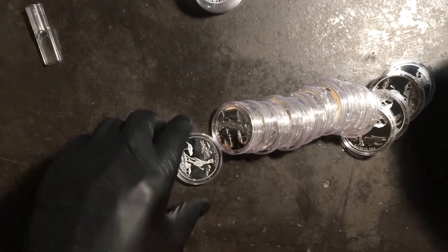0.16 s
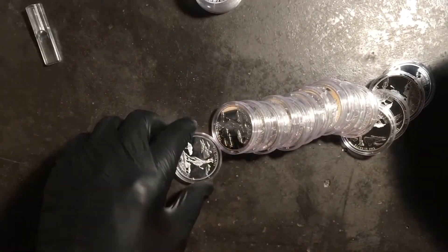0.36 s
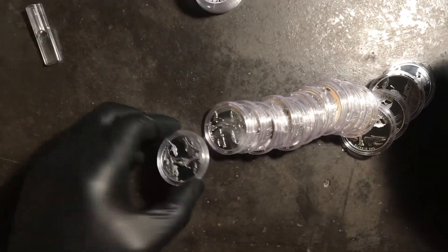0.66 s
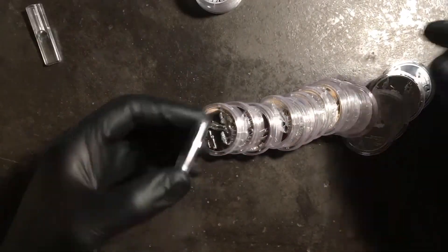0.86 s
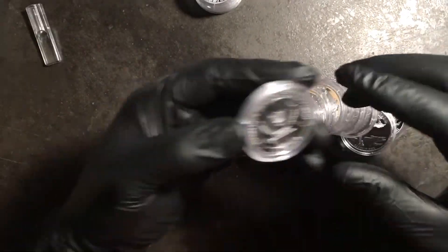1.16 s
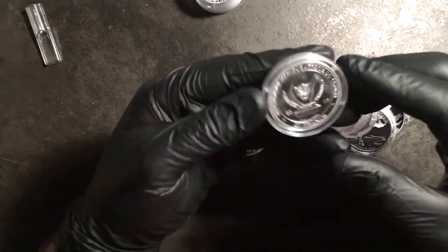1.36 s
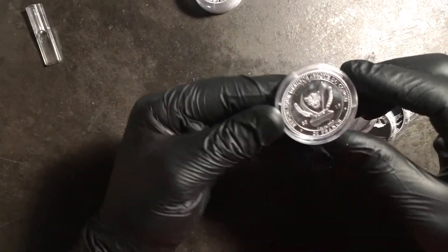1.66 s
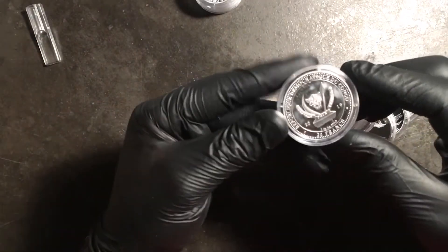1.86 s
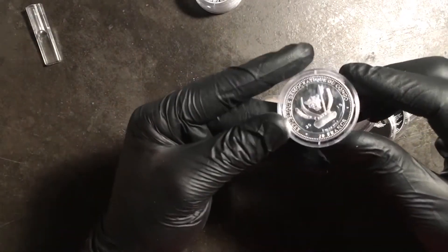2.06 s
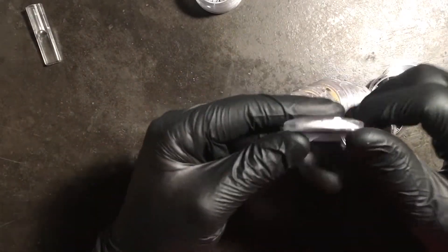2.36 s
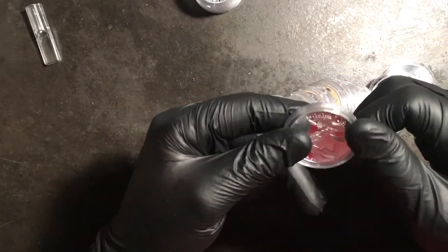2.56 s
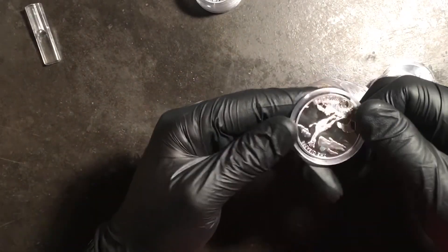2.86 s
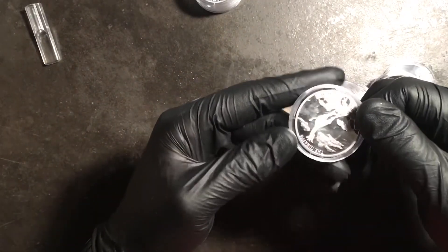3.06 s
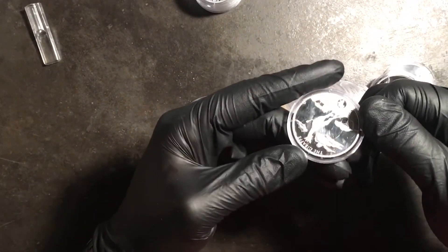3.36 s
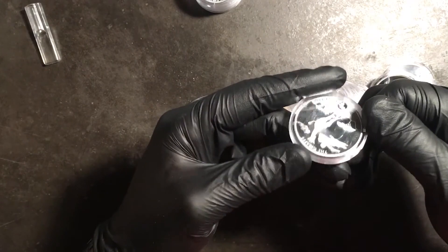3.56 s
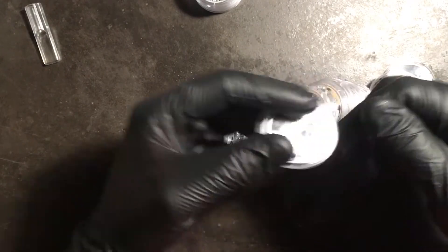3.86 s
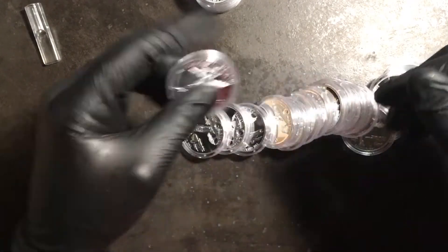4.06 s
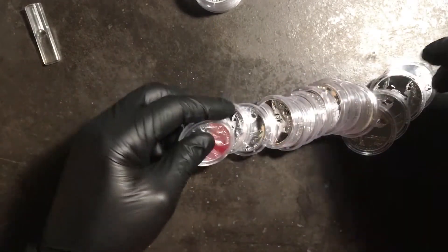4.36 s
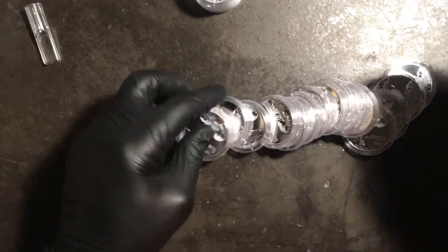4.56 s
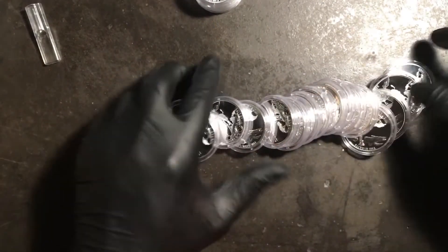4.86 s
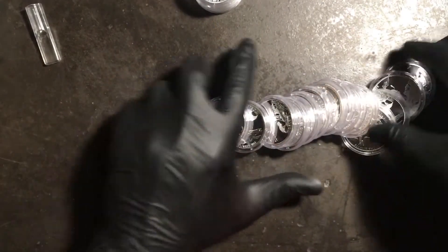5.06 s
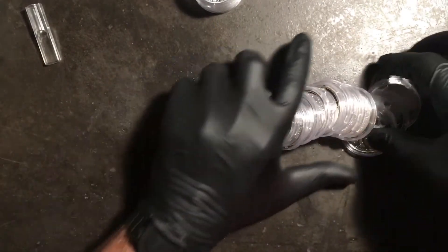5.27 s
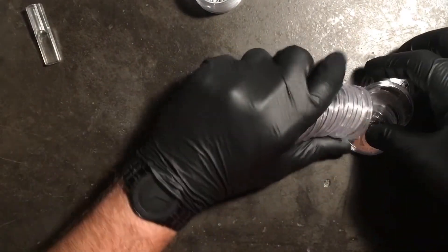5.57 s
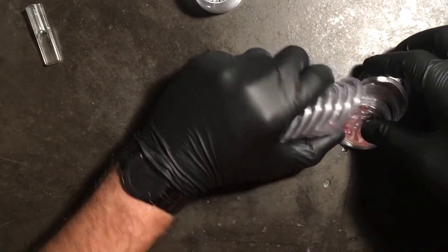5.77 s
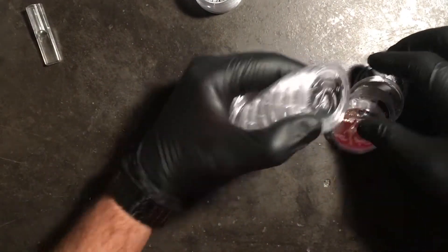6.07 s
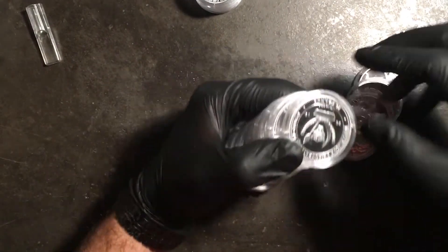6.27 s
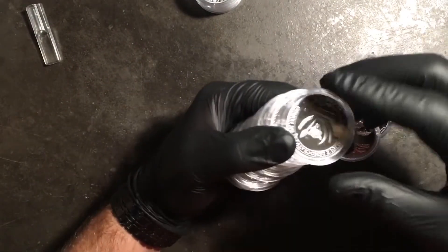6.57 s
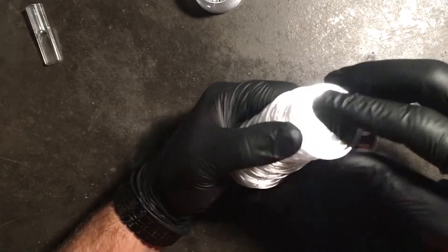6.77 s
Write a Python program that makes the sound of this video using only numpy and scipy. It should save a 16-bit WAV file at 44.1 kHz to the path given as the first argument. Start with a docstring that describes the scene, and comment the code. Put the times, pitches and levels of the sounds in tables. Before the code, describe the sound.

Close plastic clicks and a gritty slide as coin capsules are handled and stacked, with faint glove rustle and a humming vent.

```python
"""First you hear an air vent humming low with a thin motor whine, and the faint rustle of rubber gloves.
Close by, in a small room, the gloved hands pick up, turn and stack hard plastic coin capsules on a table.
A leaning row slides with a gritty scrape, and the table booms softly under a few heavier blows.
Each knock is a short chatter of tiny contacts that makes the capsule ring."""
import sys
import numpy as np
from scipy import signal
from scipy.fft import rfft, irfft
from scipy.io import wavfile
from scipy.ndimage import uniform_filter1d

SR = 44100
rng = np.random.default_rng(int(sys.argv[2]) if len(sys.argv) > 2 else 0)


def digitize_waveform(pressure):
    """Quantize a signal to 16-bit integers and store it at the path in sys.argv[1].

    Rows of a 2-D input are taken as channels; values are limited to [-1, 1].
    """
    field = np.atleast_2d(pressure).T
    bounded = np.clip(field, -1, 1)
    quanta = np.round(bounded * 32767).astype(np.int16)
    wavfile.write(sys.argv[1], SR, quanta)


N = 305596


def undb(db):
    """Turn decibels into a number to multiply by."""
    return 10 ** (np.asarray(db) / 20)


def unit(x):
    """Scale a signal to an average strength (rms) of 1."""
    return x / np.sqrt(np.mean(x ** 2))


def band(x, lo_hz, hi_hz, order=2):
    """Keep the sound between two frequencies."""
    return signal.sosfilt(signal.butter(order, [lo_hz, min(hi_hz, .45 * SR)], "band", fs=SR, output="sos"), x)


def ring(t, hz, ring_s):
    """A struck tone that fades by 60 dB in ring_s seconds."""
    return np.sin(2 * np.pi * hz * t) * np.exp(-np.log(1000) * t / ring_s)


def add(track, start_s, sound):
    """Mix a sound into the track."""
    i = int(start_s * SR)
    track[i:i + len(sound)] += sound[:len(track) - i]


def wander(per_s):
    """A smooth random drift that picks a new value per_s times a second."""
    k = int(SR / per_s)
    steps = np.repeat(rng.standard_normal(N // k + 1), k)
    return unit(uniform_filter1d(uniform_filter1d(steps, k), k)[:N])


def grit(per_s, spread_db, smooth):
    """Random ticks of uneven size over a smooth rub."""
    happens = rng.random(N) < per_s / SR
    sizes = undb(spread_db * np.minimum(rng.exponential(size=N), 3))
    return unit(happens * sizes * rng.standard_normal(N)) + smooth * rng.standard_normal(N)


# The tone of the moving air. Each row: frequency in Hz, relative level in dB.
AIR_TONE = [(15, -63), (28, -33.5), (45, -16), (140, -15.5), (190, -4), (245, -7.5), (310, -16.5),
            (490, -18.5), (640, -23), (850, -30), (1300, -40), (2300, -40), (5400, -45), (12000, -66),
            (16000, -56)]
# The notes the room booms at. Each row: pitch in Hz, width in Hz, boost in dB.
ROOM_NOTES = [(213.8, 12, 8.5), (269.8, 32, 7), (178.3, 28, 0.5), (331, 14, 8.5)]
# The slow rise and fall of the air noise. Each row: time in seconds, boost in dB.
AIR_SWELL = [(0, 1), (1.2, 0.5), (2.2, 0.5), (3.2, 0.5), (4.2, 3.5), (5.201, 2.5), (6.202, 0), (6.93, 1)]


def vent(air_db=-51, whine_hz=1170, whine_db=-76.5):
    """Air noise booms on the room's low notes and swells slowly; the fan motor adds a thin whine."""
    freqs = np.maximum(np.arange(N // 2 + 1) * SR / N, 1)
    tone_hz, tone_db = np.transpose(AIR_TONE)
    colour_db = np.interp(np.log(freqs), np.log(tone_hz), tone_db)
    colour_db += sum(db / (1 + (2 * (freqs - hz) / width) ** 2) for hz, width, db in ROOM_NOTES)
    air = unit(irfft(rfft(rng.standard_normal(N)) * undb(colour_db), N))
    swell_db = np.interp(np.arange(N) / SR, *np.transpose(AIR_SWELL)) + 0.47 * wander(3.7)
    phase = 2 * np.pi * np.cumsum(whine_hz + 1.4 * wander(11)) / SR
    whine = np.sqrt(2) * np.sin(phase) * undb(0.86 * wander(8))
    return undb(air_db + swell_db) * air + undb(whine_db) * whine


# The room's echo, band by band. Each row: rough frequency in Hz, relative level in dB, seconds to die away.
ECHO_BANDS = [(930, 10, 0.16), (2320, -7, 0.28), (4950, -2.5, 0.24), (10700, -5, 0.18)]


def room_echo(sound, build_s=0.0033):
    """Many wall echoes blur into one short tail."""
    t = np.arange(int(.45 * SR)) / SR
    tail = np.zeros(len(t))
    for hz, db, fade_s in ECHO_BANDS:
        noise = band(rng.standard_normal(len(t)), hz / 2, hz * 1.33)
        tail += undb(db) * noise * np.exp(-np.log(1000) * t / fade_s)
    tail *= 1 - np.exp(-(t / build_s) ** 2)
    return signal.fftconvolve(sound, tail / np.sqrt(np.sum(tail ** 2)))[:N]


# Glove slips. Each row: loudest moment in seconds, level then in dB, swell in seconds, low edge in Hz.
GLOVE_SLIPS = [(.045, -64, 0.013, 3940), (.102, -71, 0.02, 4500), (.2, -71.5, 0.018, 4500),
               (.313, -67, 0.021, 8000), (.885, -67, 0.013, 8000), (1.035, -73, 0.018, 5000),
               (1.32, -67, 0.1, 4870), (1.485, -70, 0.045, 8000), (1.845, -65, 0.04, 3830),
               (2.165, -66.5, 0.046, 7000), (2.272, -72, 0.018, 7000), (2.388, -71, 0.01, 8000),
               (2.48, -65.5, 0.027, 8000), (2.527, -62.5, 0.024, 4000), (2.635, -68.5, 0.043, 5000),
               (2.78, -71, 0.078, 7000), (2.945, -72.5, 0.098, 4000), (3.17, -76, 0.049, 8000),
               (3.235, -64, 0.017, 4500), (3.675, -65.5, 0.031, 5430), (4.029, -55.5, 0.011, 8000),
               (4.18, -61, 0.094, 4870), (4.62, -62, 0.097, 5040), (5.03, -56, 0.062, 5000),
               (5.12, -48, 0.044, 5960), (5.22, -52.5, 0.044, 6000), (6.04, -65, 0.11, 5000),
               (6.64, -70.5, .009, 5000), (6.8, -64, 0.014, 4010)]


def glove_rustles():
    """Rubber slips on plastic in short swells of fine, high grit that fade faster than they rise."""
    out, fine = np.zeros(N), grit(1700, 1.3, 0.8)
    half = int(.15 * SR)
    for peak_s, db, swell_s, edge_hz in GLOVE_SLIPS:
        i = max(int(peak_s * SR) - half, 0)
        t = np.arange(i, min(i + 2 * half, N)) / SR - peak_s
        shape = np.exp(-(t / np.where(t < 0, swell_s, 0.83 * swell_s)) ** 2)
        add(out, i / SR, undb(db) * shape * unit(band(fine[i:i + len(t)], edge_hz, 17000)))
    return out


# Sliding. Each row: time in seconds, scrape level in dB, level of its dull part in dB relative to that.
SLIDES = [(0.0, -91.5, 18.5), (0.45, -75.5, 0), (0.72, -65, -4), (0.88, -61, -2.5), (1.1, -65, -4),
          (1.4, -80, 9), (2.8, -80, 4), (3.0, -73.5, -8), (3.15, -101, 8), (3.48, -87, 2),
          (3.57, -69.5, -5), (3.68, -80.5, -5), (3.95, -71, -11), (4.1, -62.5, -10), (4.44, -71.5, -8),
          (4.59, -50.5, -0.5), (4.86, -63, -12.5), (5.05, -58, 1), (5.1, -39, -5.5), (5.21, -40.5, -3.5),
          (5.33, -53.5, 6.5), (5.45, -62.5, 6.5), (5.66, -65, 9), (5.72, -61.5, 9), (5.949, -68.5, 1.5),
          (6.06, -50.5, -9), (6.43, -83, 8), (6.75, -81, 7.5), (6.93, -64, -6)]


def sliding():
    """Capsule rims scrape over the table and ring a little; the gloves hiss along with them."""
    times, *levels = np.transpose(SLIDES)
    scrape_db, dull_db = (np.interp(np.arange(N) / SR, times, level) for level in levels)
    rub = (grit(1500, 0.73, 0.86) + 0.6 * grit(400, 2.2, 0.1)) * undb(1.9 * wander(120))
    t = np.arange(int(.1 * SR)) / SR
    # the rims ring with the same notes as a knocked capsule (table below)
    rim_notes = sum(undb(db) * ring(t, hz, 1.2 * ring_s) for hz, db, ring_s in CAPSULE_NOTES)
    rims = signal.fftconvolve(rub, rim_notes)[:N]
    scrape = unit(unit(band(rub, 1950, 3815, order=3)) + 0.57 * unit(band(rims, 1900, 5000)))
    dull = unit(band(rub, 870, 1900, order=3))
    glove = unit(band(grit(1300, 2.2, 1.4), 3800, 12000, order=1)) * undb(2.2 * wander(27))
    glove_db = -67 + 0.49 * (np.maximum(scrape_db, -82) + 61.5)
    return undb(scrape_db) * scrape + undb(scrape_db + dull_db) * dull + undb(glove_db) * glove


# Heavier blows that shake the table. Each row: start in seconds, level in dB.
TABLE_BLOWS = [(4.368, -55), (4.552, -41), (5.12, -45), (5.213, -49), (5.688, -49)]


def table_thuds(hz=95, ring_s=.25, rise_s=0.00837):
    """The table top booms softly on one low note."""
    out, t = np.zeros(N), np.arange(int(.3 * SR)) / SR
    for start_s, db in TABLE_BLOWS:
        add(out, start_s, undb(db) * (1 - np.exp(-t / rise_s)) * ring(t, hz, ring_s))
    return out


# The notes of a capsule with its coin; only the lowest pair made by bending rings on.
# Each row: pitch in Hz, relative level in dB, ring time in seconds when nothing holds it.
CAPSULE_NOTES = [(1333, -15, 0.04), (1983, -8, 0.04), (2273, -4, .13), (2452, -2.5, 0.13), (2730, 0, 0.03),
                 (3110, -4, .025), (3510, -2, .025), (4007, -6.5, 0.02), (4484, 0, .016), (5850, 2, 0.014),
                 (6010, -4.5, 0.014), (6910, -8, .01), (7260, -10, .01), (8600, -8.5, 0.012),
                 (9520, -16, .01)]


def capsule_ring(t, crack_db, grip, scatter_db=3):
    """A struck capsule rings with many notes at once; a tight grip cuts them short."""
    hz, db, ring_s = np.transpose(CAPSULE_NOTES)[:, :, None]
    octaves = np.log2(hz / hz[2])
    level_luck, pitch_luck = rng.standard_normal((2, len(hz), 1))
    # each blow lands elsewhere; a soft one with little crack reaches the high notes less
    gains = undb(db + scatter_db * level_luck + .4 * crack_db * np.maximum(octaves, 0))
    # capsules differ a little, most in their high notes
    pitches = hz * (1 + (0.0029 + 0.045 * np.abs(octaves)) * pitch_luck)
    return np.sum(gains * ring(t, pitches, ring_s * (1 - .8 * grip)), axis=0)


def contact_tone(t, hz, grip, ring_s=0.0073):
    """Plastic clicks on plastic; a low note makes a clamped stack sound hollow."""
    click = ring(t, hz, ring_s) + 0.3 * ring(t, 1.55 * hz, 0.56 * ring_s)
    return click + (.03 + 0.55 * grip) * ring(t, 0.42 * hz, .6 * ring_s)


def burst(t, fade_ms, rise_ms=0.85):
    """The outline of a knock: a fast rise and a quick fade."""
    return (1 - np.exp(-1000 * t / rise_ms)) * np.exp(-1000 * t / max(fade_ms, .2))


def chatter(t, fade_ms, hit_sample):
    """One main contact among many small ones; squaring noise makes it spiky, like separate hits."""
    noise = rng.standard_normal(len(t))
    hits = 0.28 * noise * np.abs(noise) * burst(t, fade_ms)
    hits[hit_sample] += 1
    return hits


def crack(t, fade_ms, hit_sample):
    """Countless high notes blur into a crack of noise, with a snap at the main contact."""
    noise = rng.standard_normal(len(t)) * burst(t, fade_ms)
    noise[hit_sample] += 2.8
    return unit(band(noise, 4200, 8500, order=1) + 0.31 * band(noise, 9000, 19000))


# How fingers and neighbours hold the capsules. Each row: time in seconds, grip from 0 (free) to 1 (clamped).
GRIP_TIGHTNESS = [(0, 0.48), (2.2, 0.91), (3.7, 0.26), (4.3, 0.041), (4.9, .1), (5.3, 0.55), (5.92, 0.89),
                  (6.93, 0.62)]
# The knocks. Each row: start in seconds, level in dB, contact pitch in Hz, crack in dB relative to the contact.
CAPSULE_KNOCKS = [(0.4118, -51.5, 3420, -4), (0.58, -47, 1960, -22), (0.6335, -45, 2050, -24),
                  (0.664, -44.5, 3340, -20), (0.6964, -41, 2800, -27), (0.719, -44.5, 2050, -19),
                  (0.759, -45, 1970, -22), (0.798, -45, 2440, -17), (0.831, -44.5, 1980, -22),
                  (0.8922, -31, 2530, -12.5), (1.286, -48, 2450, -15), (1.9467, -48.5, 2540, -33),
                  (2.1704, -51, 1870, -6), (2.2622, -49, 3970, -17), (2.356, -37.5, 2200, -10),
                  (2.529, -52.5, 2270, -11), (2.9443, -51.5, 3460, 13), (3.806, -29, 2550, -3),
                  (3.8299, -23, 2500, -3.5), (3.8979, -26.5, 2500, -2.5), (3.912, -32, 2620, -5),
                  (4.03, -36.5, 2560, -20), (4.0447, -37, 1820, 1), (4.0544, -41.5, 3970, 2),
                  (4.0691, -36, 2580, -9), (4.1706, -27.5, 2350, -4), (4.221, -35.5, 2060, -13),
                  (4.367, -10.5, 2490, -6), (4.525, -34.5, 2360, -2), (4.551, -1.5, 2330, 6),
                  (4.5634, -11.5, 2400, 9), (4.5685, -13, 2450, 9.5), (4.5752, -17, 2350, -6),
                  (4.7506, -47.5, 2360, 2), (4.813, -36.5, 3540, -13), (4.833, -36, 3430, -10.5),
                  (4.8644, -45, 3250, -6), (4.999, -59, 1340, -17), (5.0768, -24.5, 2720, -11),
                  (5.0906, -33, 1870, 10), (5.0969, -23, 2330, -2.5), (5.1109, -29, 3200, 6),
                  (5.1155, -20.5, 2480, -3), (5.1312, -24, 1390, -0.5), (5.1746, -24, 2680, -6),
                  (5.209, -23.5, 2400, -9), (5.2154, -22, 1900, -6), (5.225, -20.5, 1320, -11.5),
                  (5.2995, -21, 2030, -10), (5.362, -26, 1460, -12), (5.434, -48, 2010, -4),
                  (5.482, -45, 1310, -10.5), (5.505, -34, 1340, -26), (5.5357, -28.5, 2370, -29),
                  (5.56, -40, 2450, -17), (5.59, -42, 2380, -7), (5.612, -28, 1770, -16.5),
                  (5.6204, -34, 2020, -17), (5.6765, -41, 2370, -19), (5.686, -19.5, 2180, -2.5),
                  (5.6932, -19, 1890, -15.5), (5.838, -40, 1310, -16), (5.8516, -28.5, 1300, -32),
                  (5.8786, -31.5, 1430, -18), (5.89, -36.5, 1560, -12), (5.987, -29.5, 2860, 3.5),
                  (6.0084, -33.5, 2640, -7), (6.0435, -36.5, 2160, -12), (6.0894, -43, 2200, -15),
                  (6.1087, -43, 2130, -24), (6.181, -48, 3770, -12), (6.801, -34, 1186, -12.5),
                  (6.917, -34.5, 2630, 2.5)]


def capsule_knocks(thin_below_hz=1470):
    """Each knock is a chatter that sets off a contact tone and the capsule's ring, topped by a crack."""
    out, t = np.zeros(N), np.arange(int(.12 * SR)) / SR
    hit_sample = int(.0008 * SR)
    for start_s, db, hz, crack_db in CAPSULE_KNOCKS:
        grip = np.clip(np.interp(start_s, *np.transpose(GRIP_TIGHTNESS)), 0, 1)
        chatter_ms = 2.13 + 0.13 * crack_db + 1.5 * grip  # longer when bright or tightly held
        hits = chatter(t[:len(t) // 5], chatter_ms, hit_sample)
        contact = unit(signal.fftconvolve(contact_tone(t, hz, grip), hits)[:len(t)])
        ringing = unit(signal.fftconvolve(capsule_ring(t, crack_db, grip), hits)[:len(t)])
        ring_db = 0.5 + 0.15 * crack_db - 7 * grip
        sound = contact + undb(ring_db) * ringing + undb(crack_db) * crack(t, 1.38 * chatter_ms, hit_sample)
        peak = np.sqrt(2 * uniform_filter1d(sound ** 2, size=40).max())
        # small discs give off little bass; a clamped stack reaches lower
        thinned = band(sound, thin_below_hz * (1 - 0.4 * grip), 20000)
        add(out, start_s, undb(db) * thinned / peak)
    return out


def scene(echo_db=-13.5):
    """Mix the vent, gloves, scrapes and thuds with the knocks and their echo, in one channel."""
    knocks = capsule_knocks()
    behind = vent() + glove_rustles() + sliding() + table_thuds()
    return (behind + undb(echo_db) * room_echo(knocks) + knocks)[None]


def record(dry, ceiling=.85, top_hz=15550):
    """Round off the loudest peaks and cut the highest treble."""
    rounded = ceiling * np.tanh(dry / ceiling)
    return signal.sosfilt(signal.ellip(8, .5, 60, top_hz, fs=SR, output="sos"), rounded)


dry = scene()
out = record(dry)
digitize_waveform(out)
```